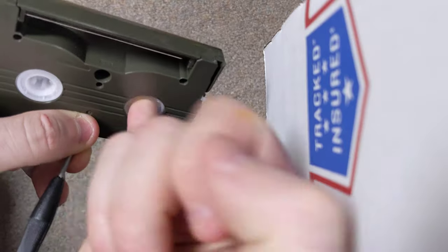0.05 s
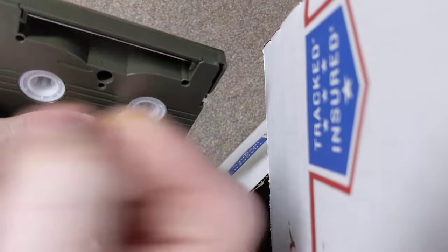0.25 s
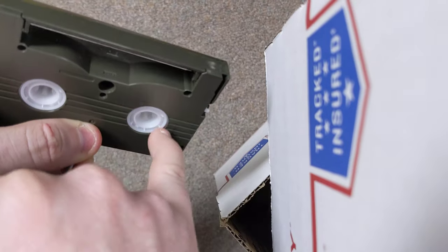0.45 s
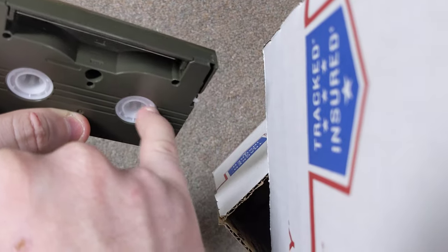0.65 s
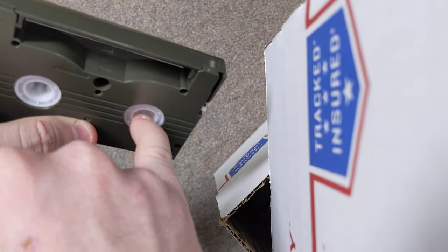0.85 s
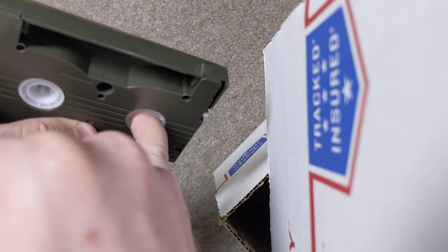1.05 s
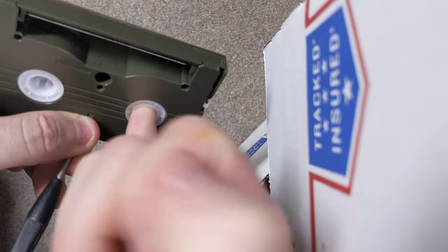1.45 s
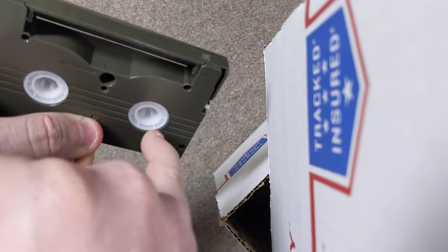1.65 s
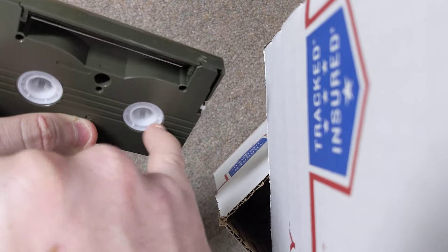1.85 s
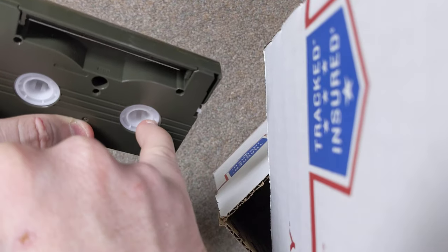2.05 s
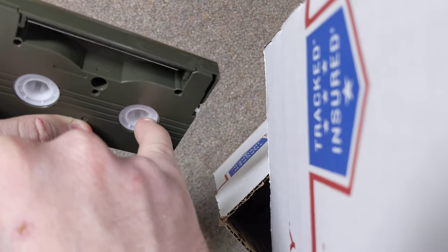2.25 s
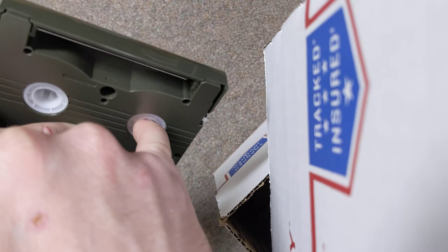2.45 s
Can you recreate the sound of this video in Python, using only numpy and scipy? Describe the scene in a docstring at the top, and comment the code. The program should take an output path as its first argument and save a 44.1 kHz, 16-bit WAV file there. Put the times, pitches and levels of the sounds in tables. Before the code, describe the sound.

Plastic clicks and rattles of a video cassette reel turned by a finger, close up.

```python
"""A finger works the reel of a video cassette close to the microphone in a small, quiet room.
First the hand rubs faintly and bumps something hollow, and the reel's hub knocks in its plastic shell.
After a second the hub rattles, slips over the teeth of its lock and gives its loudest knock.
Near the end the reel's sprung catch pings three times among a few lighter knocks.
Mains hum and room noise lie underneath all the way through."""
import sys
import numpy as np
from scipy import signal
from scipy.fft import rfft, irfft, next_fast_len
from scipy.io import wavfile
from scipy.ndimage import uniform_filter1d

SR = 44100
rng = np.random.default_rng(int(sys.argv[2]) if len(sys.argv) > 2 else 0)


def master(y):
    """Save y as 16-bit WAV."""
    cut = np.clip(np.atleast_2d(y).T, -1, 1)
    pcm = np.round(cut * 32767)  # scale
    wavfile.write(sys.argv[1], SR, pcm.astype(np.int16))


N = 110250  # 2.5 seconds


def cassette():
    """The hub knocks in the shell and its teeth snap the lock spring. Every hit makes the shell ring."""
    # Hub hits. Each row: start in seconds, knock in dB, clack in dB, clack pitch in Hz,
    # bite (the hub's own higher note) in dB, crack in dB.
    hits = [(0.0286, -30, -7.5, 880, -22, -51), (0.2824, 4, 10, 1166, 0, -10.5),
            (0.289, 1.5, 9.5, 845, -2, -14.5), (0.2917, -13, -5, 1320, 7, -2),
            (0.8922, -9, 13, 1310, 7, -11), (0.9017, -29, -24, 1450, -27, -30),
            (0.9187, -19, -19, 1400, -25, -26), (0.9337, -10, -7.5, 1150, -32, -23),
            (.9844, -12, -9, 880, -1, -15.5), (1.0422, -26, -3, 1140, -9, -17),
            (1.0504, -5.5, -4, 880, 5, -11), (1.056, -36, -4.5, 1400, -4, -21),
            (1.126, -30, -20, 1400, -19, -29.5), (1.5494, 4, 17.5, 1176, 9, 4.5),
            (1.556, 6, 14.5, 1440, -2, -5), (2.3558, -13.5, -2, 1316, -6, -27.5),
            (2.4403, -20, -14, 1350, -25, -27.5), (2.4539, -4.5, -11.5, 1100, -25, -13)]
    # Teeth slipping past the lock in a quick run of snaps that speeds up and fades.
    # Each row: start in seconds, clack in dB, snap in dB.
    teeth = [(1.2638, -2, -6), (1.2762, 2, 7), (1.2872, 0, 1), (1.2957, -3, -4), (1.3034, -1, -5),
             (1.3105, -11, -14), (1.3195, -12, -19)]
    # Notes of the shell and spring. Each row: pitch in Hz, gain in dB, seconds to fade by 60 dB.
    shell_notes = [(888, -2.5, 0.083), (1086, -5, 0.063), (1220, -3.5, 0.11), (1461, -32.5, 0.27),
                   (1450, -18, 0.12), (1710, -8.5, 0.17), (1774, -3.5, 0.029), (2350, -45, 0.15),
                   (3280, -10, 0.025)]
    spring_notes = [(5640, -20, 0.071), (5540, -19, .1), (5640, -3, .1), (6300, -12, 0.1),
                    (6405, -17, 0.092), (6860, 6, 0.1), (6550, -1, .09)]
    # Tone of the clacks, cracks and snaps. Each row: frequency in Hz, gain in dB.
    clack_tone = [(100, -26.5), (580, -11.5), (850, 2.5), (2300, 0), (3200, 11.5), (6000, 30), (16000, -23)]
    crack_tone = [(300, -25.5), (700, -17), (1100, -9.5), (2400, -0.5), (3700, -3.5), (6300, -3),
                  (8400, -10.5), (10000, -6.5), (12500, -12.5), (16000, -24)]
    snap_tone = [(500, -18), (2200, -6.5), (3800, -13.5), (5400, -2), (7000, -5), (8700, -17),
                 (10200, -9.5), (12000, -10), (16000, -22)]
    knock, clack, crack, snap = np.zeros((4, N))
    bite = ping(hz=2090, t60=0.009)
    for start, knock_db, clack_db, hz, bite_db, crack_db in hits:
        add(knock, start, amp(knock_db) * ping(hz=319, t60=0.025))
        add(clack, start, amp(clack_db) * ping(hz, t60=0.0075) - amp(bite_db) * bite)
        add(crack, start, amp(crack_db) * burst(t60=0.0091))
    tooth = ping(hz=1320, t60=0.0075) - amp(0.5) * bite
    for start, clack_db, snap_db in teeth:
        add(clack, start, amp(clack_db) * tooth)
        add(snap, start, amp(snap_db) * burst(t60=0.0074))
    spring = ring(colour(snap, snap_tone), spring_notes)
    blows = knock + colour(clack, clack_tone) + colour(crack, crack_tone) + spring
    return ring(blows, shell_notes)


def graze(hits):
    """The parts graze each other just before they strike, so a faint scrape swells into each hit."""
    t = np.arange(N // 200) / SR
    shape = np.exp(-t / 0.0019)
    scrape = amp(-12.5) * unit_energy(shape) * rng.standard_normal(len(t))
    return hits + convolve(hits[::-1], scrape)[::-1]  # backwards, so the scrape comes first


def catch():
    """The reel's sprung catch pings with its own short notes, brighter when flicked harder."""
    # Each row: start in seconds, level in dB, brightness in dB per octave.
    flicks = [(2.089, -11.5, -2), (2.232, -14.5, -7), (2.488, -2.5, 0.5)]
    # Notes of the catch. Each row: pitch in Hz, level in dB, seconds to fade by 60 dB.
    notes = [(1730, 4, 0.042), (2710, -5.5, 0.014), (3910, 2, 0.022), (5500, -5.5, 0.015),
             (7340, -10.5, .02), (9460, -8, 0.0076), (13100, -13, 0.011)]
    out = np.zeros(N)
    for start, db, brightness in flicks:
        for hz, note_db, t60 in notes:
            octaves_up = np.log2(hz / notes[0][0])
            add(out, start, amp(db + note_db + brightness * octaves_up) * ping(hz, t60))
    return out


def bump(t):
    """The hand bumps something hollow: a soft thud whose pitch sinks as it swells."""
    start_s, peak_s, rise_s, fall_s = 0.197, 0.218, 0.012, 0.005
    start_hz, end_hz, sink_s = 360, 66, 0.008
    age = np.maximum(t - start_s, 0)
    hz = end_hz + (start_hz - end_hz) * np.exp(-age / sink_s)
    shape = np.exp(-np.maximum((peak_s - t) / rise_s, (t - peak_s) / fall_s))
    return amp(-21) * shape * np.sin(2 * np.pi * np.cumsum(hz * (age > 0)) / SR)


def scuffs(t):
    """Each scuff of the hand hisses briefly and leaves a hollow rumble."""
    # Each row: start and rise in seconds, rumble in dB, its fade in seconds,
    # hiss in dB, its fade in seconds. One fade time lowers the level to about a third.
    strokes = [(0.195, 0.028, -35.5, 0.096, -41, 0.025), (0.434, 0.017, -42.5, 0.034, -57, 0.025)]
    # Tone of the rumble and the hiss. Each row: frequency in Hz, gain in dB.
    rumble_tone = [(25, -17), (60, -11.5), (100, -2), (140, -6), (185, -2), (240, -11.5), (350, -19.5),
                   (550, -26.5), (1000, -28), (3000, -53.5)]
    hiss_tone = [(200, 1), (700, 3), (1500, 0.5), (2600, 0), (5000, -6), (9000, -7.5), (15000, -6.5)]
    rumble_level = hiss_level = 0
    for start, rise, rumble_db, rumble_fade, hiss_db, hiss_fade in strokes:
        swell = np.sqrt(np.clip((t - start) / rise, 0, 1))
        after = np.maximum(t - start - rise, 0)
        rumble_level += amp(rumble_db) * swell * np.exp(-after / rumble_fade)
        hiss_level += amp(hiss_db) * swell * np.exp(-after / hiss_fade)
    rumble = rumble_level * noise(rumble_tone)
    hiss = hiss_level * amp(0.97 * wander(360)) * noise(hiss_tone)
    return sides(left_db=-3) * rumble + sides(left_db=-6) * hiss


def rubbing(t):
    """Skin slides faintly and unevenly as the hand swings round, and now and then squeaks."""
    # Each row: start in seconds, end in seconds, level in dB.
    slides = [(-.05, 0.288, -60), (1.147, 1.401, -59.5), (1.402, 1.568, -62.5)]
    # Tone of sliding skin. Each row: frequency in Hz, gain in dB.
    skin_tone = [(200, -4.5), (900, 5), (1500, 3), (3000, -3.5), (3800, -5.5), (4350, 1.5), (4900, -8.5),
                 (5600, 2), (6500, -3.5), (7350, 6), (8100, -4.5), (9000, -1.5), (10500, -8), (16000, -9)]
    # Each row: start and length in seconds, first and last pitch in Hz, level in dB.
    squeaks = [(1.147, 0.15, 7450, 7400, -56), (1.351, 0.047, 7750, 7250, -56),
               (1.381, 0.029, 5200, 5800, -57.5)]
    edge_s, wobble_hz = 0.021, 214
    level = 0
    for start, end, db in slides:
        level += amp(db) * np.clip(np.minimum(t - start, end - t) / edge_s + 0.5, 0, 1)
    out = level * amp(1.8 * wander(68.37)) * noise(skin_tone, alike=0.14)
    for start, length, from_hz, to_hz, db in squeaks:
        progress = np.clip((t - start) / length, 0, 1)
        hz = from_hz + (to_hz - from_hz) * progress + wobble_hz * wander(820)
        out += amp(db) * np.sin(np.pi * progress) * np.sin(2 * np.pi * np.cumsum(hz) / SR)
    return sides(left_db=-9) * out


def left_side(x):
    """The microphone's left side hears the cassette slightly early, and duller because it faces away."""
    # Each row: frequency in Hz, how far the left side is ahead in radians.
    head_start = [(100, 0.24), (500, .6), (1100, 1.9), (2000, 1.3), (4000, 2.44), (8000, 3), (16000, 7.4)]
    # Each row: frequency in Hz, gain on the left in dB.
    shade = [(100, -5), (1000, -8), (2500, -10.5), (6000, -13), (10000, -17), (15000, -23)]
    hz = np.arange(N + 1) * SR / (2 * N)
    turn = np.interp(hz, *np.array(head_start).T)
    early = irfft(rfft(x, 2 * N) * np.exp(1j * turn))[:N]
    return colour(early, shade)


def room(x):
    """The sound arrives directly, then echoes briefly off nearby surfaces and the carpeted room."""
    # Tone of the echoes, and their extra dulling on the left. Each row: frequency in Hz, gain in dB.
    echo_tone = [(100, -1), (500, -4), (1300, -5.5), (3000, 0), (6000, -2.5), (10000, -4.5), (16000, -6)]
    left_tone = [(100, -2), (1500, -3), (6000, -6), (10000, -10), (15000, -16)]
    near_db, near_t60, room_db, room_t60, gap_s = -6.5, 0.063, -13, 0.13, 0.0012
    t = np.arange(N // 5) / SR
    echoes = 0
    for db, t60 in ((near_db, near_t60), (room_db, room_t60)):
        shape = fade(t, t60) * np.clip(t / gap_s - 1, 0, 1)
        echoes += amp(db) * unit_energy(shape) * rng.standard_normal((2, len(t)))
    direct = np.array([left_side(x), x])
    reflected = colour(np.array([colour(x, left_tone), x]), echo_tone)
    return direct + convolve(reflected, echoes)


def mains_hum(t):
    """The mains hums on three low notes whose level wavers."""
    # Each row: pitch in Hz, level in dB relative to the overall hum.
    notes = [(59.4, 1), (118.8, -13.5), (398, -17.5)]
    # Each row: time in seconds, overall hum level in dB.
    levels = [(0, -63.5), (.6, -60.5), (.74, -59.5), (.9, -63.5), (1.6, -61), (1.73, -70), (1.83, -57.5),
              (1.98, -62.5), (2.3, -59), (2.5, -62)]
    hum = sum(amp(db) * np.sqrt(2) * np.sin(2 * np.pi * (hz * t + rng.random())) for hz, db in notes)
    level_db = np.interp(t, *np.array(levels).T) + 0.5 * wander(12)
    return sides(left_db=-4) * hum * amp(level_db)


def room_noise():
    """The quiet room gives a steady, low rush."""
    # Each row: frequency in Hz, gain in dB.
    air_tone = [(25, -10.5), (45, -9), (70, -15), (95, -15), (200, -12.5), (300, -17.5), (500, -25.5),
                (700, -23), (1300, -26.5), (2200, -34), (5000, -38.5), (9500, -43), (11000, -45.5),
                (15000, -40)]
    return amp(-61.5) * noise(air_tone, alike=0.2)


def ping(hz, t60):
    """One quickly dying vibration, with a gain of 1 at its pitch."""
    t = np.arange(N // 32) / SR
    shape = (1 - np.exp(-t / 0.00035)) * fade(t, t60)
    return 2 * shape * np.sin(2 * np.pi * hz * t) / shape.sum()


def burst(t60):
    """A few milliseconds of noise, standing for many high vibrations at once."""
    t = np.arange(N // 32) / SR
    shape = (1 - np.exp(-t / 0.0009)) * fade(t, t60)
    return unit_energy(shape * rng.standard_normal(len(t)))


def ring(blow, notes):
    """A blow plus the notes that it leaves ringing."""
    t = np.arange(N // 8) / SR
    ringing = 0
    for hz, db, t60 in notes:
        strength = amp(db) * 2 * np.log(1000) / (t60 * SR)
        ringing += strength * fade(t, t60) * np.sin(2 * np.pi * hz * t)
    return blow + convolve(blow, ringing)


def colour(x, tone):
    """Shape the tone of a sound along a curve of (Hz, dB) points."""
    tone_hz, tone_db = np.array(tone, float).T
    size = next_fast_len(2 * x.shape[-1] + 4096) * 2
    hz = np.maximum(np.arange(size // 2 + 1) * SR / size, 1)
    gain = amp(np.interp(np.log(hz), np.log(tone_hz), tone_db))
    # Fold the filter forward in time, so nothing sounds ahead of a hit.
    folded = irfft(np.log(gain))
    folded[1:size // 2] *= 2
    folded[size // 2 + 1:] = 0
    return irfft(rfft(x, size) * np.exp(rfft(folded)))[..., :x.shape[-1]]


def noise(tone, alike=0.0):
    """Stereo noise of strength 1; alike, from 0 to 1, is how much the two sides share."""
    separate = np.sqrt(1 - alike) * rng.standard_normal((2, N))
    shared = np.sqrt(alike) * rng.standard_normal(N)
    x = colour(separate + shared, tone)
    return x / x.std()


def wander(rate):
    """A smooth random drift of size about 1, with rate new values a second."""
    hold = max(int(SR / rate), 1)
    steps = np.repeat(rng.standard_normal(N // hold + 1), hold)
    drift = uniform_filter1d(uniform_filter1d(steps, hold), hold)[:N]
    return drift / drift.std()


def amp(db):
    return 10 ** (np.asarray(db) / 20)


def sides(left_db):
    return np.array([[amp(left_db)], [1]])


def fade(t, t60):
    """Die away by 60 dB every t60 seconds."""
    return np.exp(-np.log(1000) * t / t60)


def unit_energy(x):
    return x / np.sqrt(np.sum(x ** 2))


def convolve(x, response):
    return signal.fftconvolve(x, response, axes=-1)[..., :N]


def add(out, start_s, x):
    first = max(int(start_s * SR), 0)
    out[first:first + len(x)] += x[:max(N - first, 0)]


def scene():
    """The cassette in its room, the moving hand and the background, in stereo."""
    t = np.arange(N) / SR
    reel = room(graze(cassette()) + catch())
    thud = sides(left_db=-5) * np.array([bump(t - 0.0015), bump(t)])  # later and weaker on the left
    return reel + thud + scuffs(t) + rubbing(t) + mains_hum(t) + room_noise()


def record(dry):
    """Cut the highest treble, above 16000 Hz."""
    return signal.sosfilt(signal.ellip(10, 0.2, 80, 16000, fs=SR, output="sos"), dry)


dry = scene()
out = record(dry)
master(out)
```